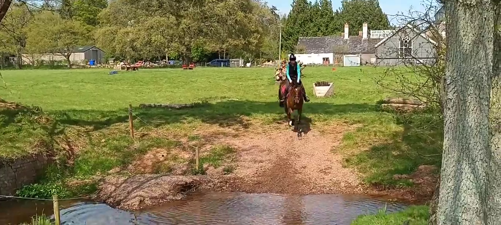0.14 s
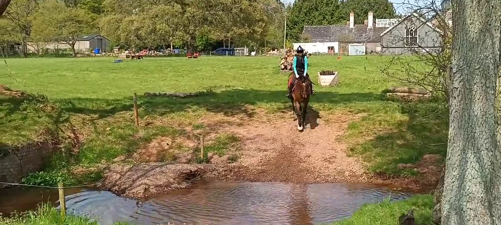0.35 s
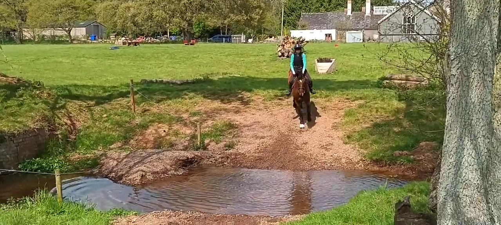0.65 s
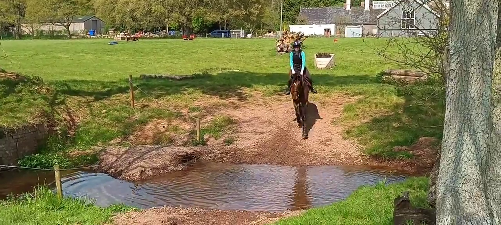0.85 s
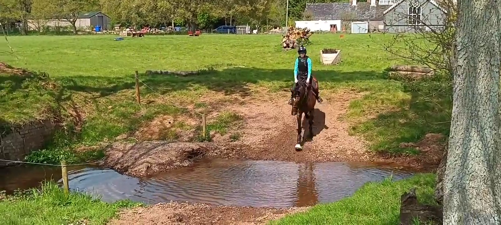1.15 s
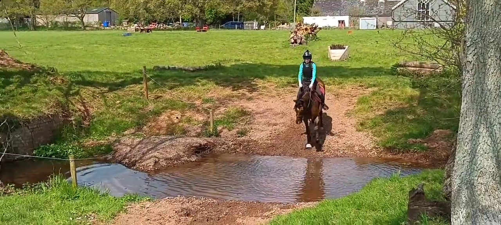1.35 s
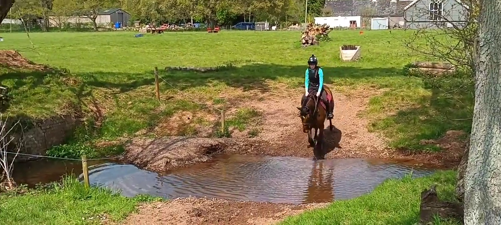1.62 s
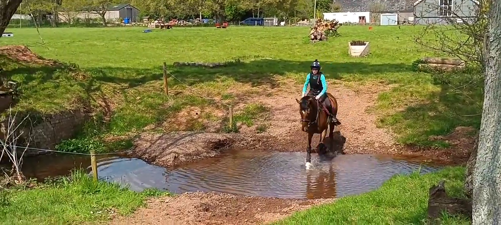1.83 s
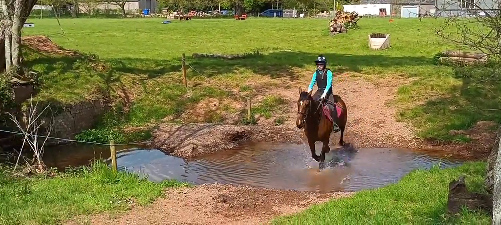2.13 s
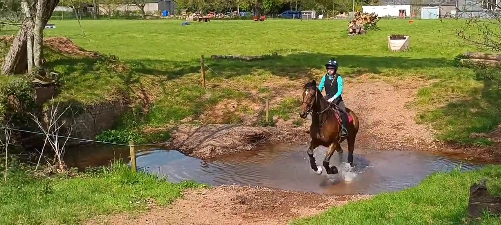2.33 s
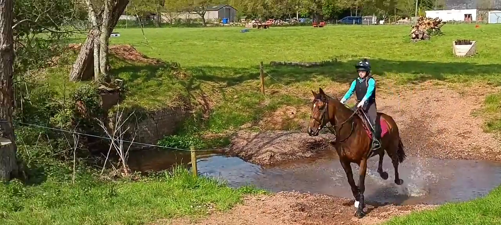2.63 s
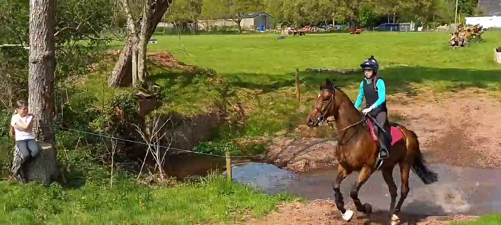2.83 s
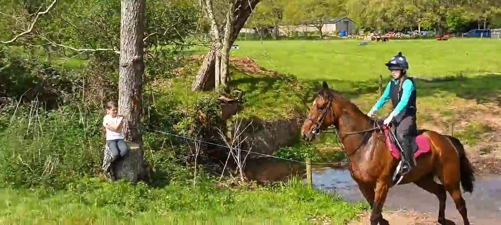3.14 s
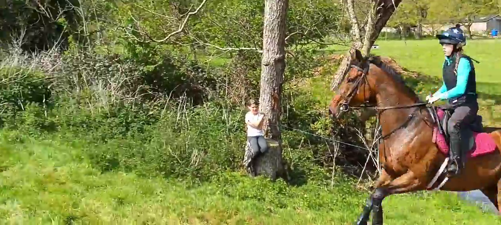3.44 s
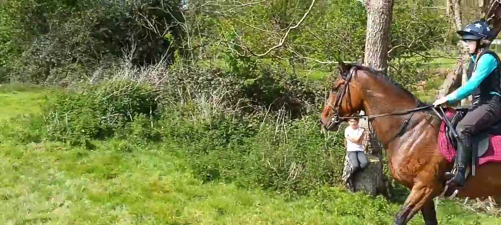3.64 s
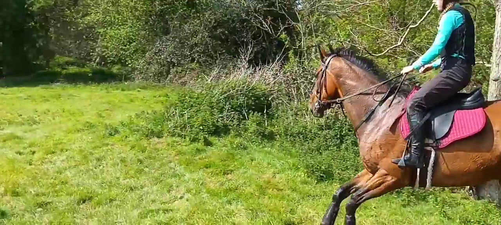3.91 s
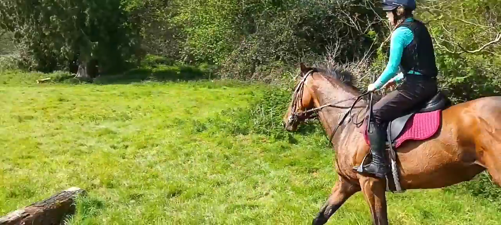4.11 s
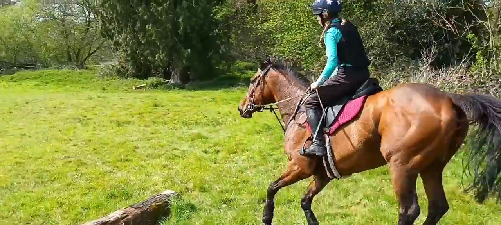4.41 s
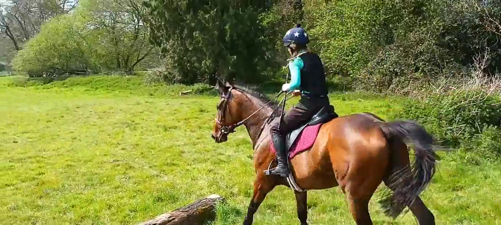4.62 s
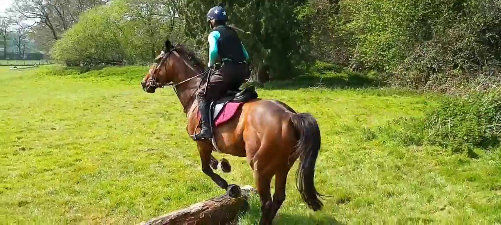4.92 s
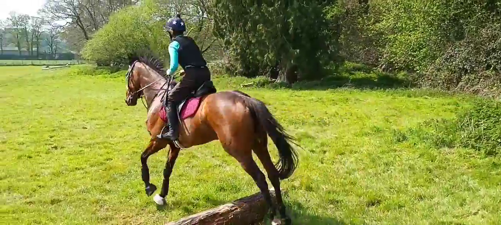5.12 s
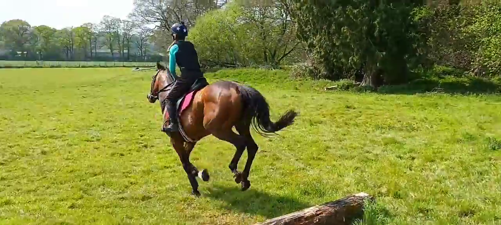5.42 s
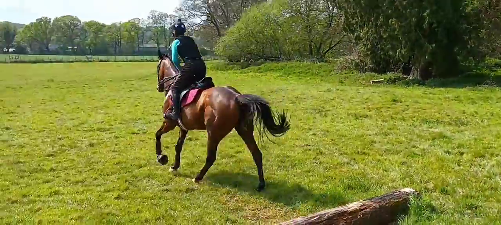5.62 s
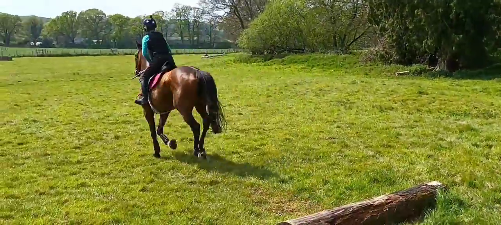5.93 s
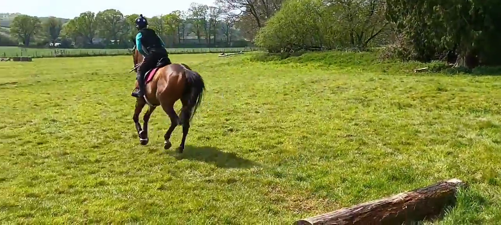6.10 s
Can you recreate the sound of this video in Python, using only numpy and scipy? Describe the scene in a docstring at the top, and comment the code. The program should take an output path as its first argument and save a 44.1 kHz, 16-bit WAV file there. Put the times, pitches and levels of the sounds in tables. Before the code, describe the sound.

Hooves crunch on gravel, splash through a shallow pool and thud by on turf, with a light breeze in an open field.

```python
"""A puff of breeze and the scuff of hooves on gravel: a horse comes down a bank, splashes through a
shallow pool and canters close past over turf into an open field. Hoof impacts excite damped thuds and
clacks; thrown stones and drops add up to granular noise, and trapped air rings as bubbles. Grass
rustles, leather creaks and the tack clinks once. Turbulence buffets the two ports of a small hand-held
microphone, over the faint murmur of open country."""
import sys
import numpy as np
from scipy import signal
from scipy.fft import rfft, irfft, next_fast_len
from scipy.io import wavfile
from scipy.ndimage import map_coordinates

SR = 44100
rng = np.random.default_rng(int(sys.argv[2]) if len(sys.argv) > 2 else 0)


def persist_wave(psi):
    """Save psi, clipped to +-1, as 16-bit WAV."""
    counts = np.round(np.clip(psi, -1, 1) * 32767).astype(np.int16)
    wavfile.write(sys.argv[1], SR, np.atleast_2d(counts).T)


N = 276066


def from_db(db):
    """Amplitude ratio of a level in decibels."""
    return 10 ** (np.asarray(db) / 20)


def rms_one(x):
    """Normalisation to unit mean power."""
    return x / np.sqrt(np.mean(x ** 2) + 1e-20)


def clock():
    """Time of every sample [s]."""
    return np.arange(N) / SR


def curve(rows, s):
    """Linear interpolation of (time, value) rows at time s."""
    return np.interp(s, *np.transpose(rows))


def colour(x, points):
    """Zero-phase filtering by a (frequency [Hz], gain [dB]) curve."""
    hz, db = np.transpose(points)
    size = next_fast_len(N + 4096)
    log_hz = np.log(np.arange(size // 2 + 1) * SR / size + 1)
    gain = from_db(np.interp(log_hz, np.log(hz), db))
    return irfft(rfft(x, size) * gain, size)[..., :N]


def band(x, low_hz, high_hz, order=2):
    """Causal Butterworth band-pass."""
    edges = [low_hz, min(high_hz, SR / 2 - 500)]
    return signal.sosfilt(signal.butter(order, edges, "band", fs=SR, output="sos"), x)


def noise(shape, low_hz, high_hz, order=2):
    """Band-limited Gaussian noise of unit rms."""
    return rms_one(band(rng.standard_normal(shape), low_hz, high_hz, order))


def pan(db):
    """Constant-power gains for a left-right level difference."""
    gains = from_db(np.array([db, -db]).reshape(2, -1) / 2)
    return gains / np.sqrt(np.mean(gains ** 2, axis=0))


def add(out, s, sound):
    """Superposition of a sound starting at time s."""
    at = max(round(s * SR), 0)
    out[:, at:at + sound.shape[-1]] += sound[..., :max(N - at, 0)]


def swell(t, rise):
    """Impact envelope: quadratic onset, height 1 at `rise`, rapid decay."""
    return (t / rise) ** 2 * np.exp(2 - 2 * t / rise)


def fade(t, rise, t60):
    """Linear attack, then exponential decay by 60 dB in t60."""
    return np.minimum(t / rise, 1) * from_db(-60 * np.maximum(t - rise, 0) / t60)


def grains(spectrum, per_s, spread_db, cycles, clump_db, count=14):
    """Shot noise: random impacts excite `count` resonators, each with a t60 of `cycles` periods."""
    out = np.zeros((2, N))
    low_hz, high_hz = spectrum[0][0], spectrum[-1][0]
    for hz in np.geomspace(low_hz, high_hz, count):
        hits = np.flatnonzero(rng.random(N) < per_s / count / SR)
        clumps = np.interp(hits, np.linspace(0, N, 300), rng.normal(0, 1, 300))
        sizes_db = spread_db * np.minimum(rng.exponential(1, len(hits)), 3.5) + clump_db * clumps
        sizes = from_db(sizes_db) * rng.choice([-1, 1], len(hits))
        skew = rng.integers(-2, 3, len(hits))  # scattered spots reach the ports at different times
        clicks = np.full((2, N), 1e-18)
        clicks[0, hits] = sizes
        clicks[1, np.clip(hits + skew, 0, N - 1)] = sizes * from_db(rng.normal(0, 0.74, len(hits)))
        radius, angle = from_db(-60 * hz / cycles / SR), 2 * np.pi * hz / SR
        feedback = [1, -2 * radius * np.cos(angle), radius ** 2]
        out += signal.lfilter(np.array([1, 0, -1]) * (1 - radius ** 2) / 2, feedback, clicks)
    return rms_one(colour(band(out, low_hz, high_hz), spectrum))


def hushed(at_s=5.905):
    """A 10 ms ramp from 0 to 1, where the rustle drops away and a thin hiss enters."""
    return np.clip((clock() - at_s) / .01, 0, 1)


# Spectrum of the open field: (frequency [Hz], gain [dB])
FIELD_SPECTRUM = [(25, -26.5), (70, 14.5), (110, -7), (280, 0), (480, -4), (800, -0.5), (1200, -11.5),
                  (2200, -30.5), (3100, -22), (4500, -13), (7000, -39.5), (9000, -37)]
# Soft mid-range hiss: (time [s], level [dB])
MURMUR_LEVEL = [(0, -66.5), (0.7, -67.5), (1.4, -70), (3, -74.5)]
def field(level_db=-65, hiss_db=-74.5, hiss_hz=2975, width_hz=1100):
    """Ambient noise of open country, partly coherent between the ports, with a thin hiss at the end."""
    air = rng.standard_normal((2, N)) + 0.87 * rng.standard_normal(N)
    murmur = from_db(curve(MURMUR_LEVEL, clock())) * noise((2, N), 450, 2100, order=3)
    hiss = hushed() * rms_one(band(air, hiss_hz - width_hz / 2, hiss_hz + width_hz / 2))
    return from_db(level_db) * rms_one(colour(air, FIELD_SPECTRUM)) + murmur + from_db(hiss_db) * hiss


# Faint held tones: (time [s], duration [s], frequency [Hz], level [dB])
FAR_TONES = [(3.654, 1.45, 379.3, -74), (4.52, 0.53, 517, -74.5)]
def far_tones(waver_hz=2.9):
    """Far-off sinusoids swell and fade, wavering by slow random frequency modulation."""
    out = np.zeros((2, N))
    for s, length, hz, db in FAR_TONES:
        size = int(length * SR)
        waver = np.interp(np.arange(size), np.linspace(0, size, 12), rng.normal(0, waver_hz, 12))
        phase = 2 * np.pi * np.cumsum(hz + waver) / SR
        add(out, s, from_db(db) * np.sqrt(2 * np.hanning(size)) * np.sin(phase))
    return out


# Strength of the breeze: (time [s], relative level [dB])
BREEZE_LEVEL = [(0.0, -76), (0.59, -72), (1.41, -48.5), (2.2, -66.5), (3.1, -60), (3.6, -75), (3.9, -73),
                (4.36, -63.5), (4.6, -70.5), (5.0, -65.5), (5.4, -67.5), (5.65, -59), (6.26, -77.5)]
# Air bumping a port: (time [s], relative level [dB], left-right [dB])
PUFFS = [(0.083, -32.5, 31), (0.531, -33, 11), (0.557, -22.5, 32), (0.813, -34, 32), (1.2198, -26.5, -29),
         (1.255, -37.5, -25), (1.381, -29.5, 37), (1.587, -30.5, -36), (2.495, -36.5, -18),
         (2.753, -41.5, -8), (2.886, -46, -34), (3.497, -39, 28), (4.144, -44, 4), (4.9642, -39, -29),
         (6.187, -38, -32.5)]
def breeze(rumble_db=3, puff_db=-2.5, puff_hz=106.4, eddy_db=-13):
    """Turbulent pressure rumbles at the ports; single puffs bump one and trail off in eddies."""
    air = rng.standard_normal((2, N)) + 0.37 * rng.standard_normal(N)
    out = from_db(curve(BREEZE_LEVEL, clock()) + rumble_db) * rms_one(band(air, 53, 167, order=3))
    t, rise = np.arange(SR // 4) / SR, 0.52 / puff_hz
    bump = swell(t, rise) * np.cos(2 * np.pi * puff_hz * (t - rise))
    for s, db, side in PUFFS:
        eddies = noise(len(t), 69.5, 1.21 * puff_hz) * fade(t, 0.018, t60=0.28)
        add(out, s - rise, from_db(db + puff_db) * pan(side) * bump)
        add(out, s - .03, from_db(db + eddy_db) * pan(side) * eddies)
    return out


def nearness_db(pass_s=3.13, closest_m=7.8, speed_m_per_s=7.3):
    """Spherical spreading from a horse on a straight path, relative to its closest point."""
    return -20 * np.log10(np.hypot(1, speed_m_per_s * (clock() - pass_s) / closest_m))


# Direction of the horse: (time [s], left-right [dB])
BEARING = [(0.2, 6), (0.55, 6.5), (0.85, 1.5), (2.1, 0), (2.6, -2.5), (3.35, -2.5), (4.4, 0.5), (4.8, 5),
           (5.3, 6.5), (5.75, 4), (6.05, 17)]
def bearing_db(s):
    """The level difference between the ports locates the horse at time s."""
    return curve(BEARING, s)


# Arrival-time difference: (time [s], lead of the left port [s])
LEFT_LEAD = [(0, .00014), (3.9, .00012), (4.6, 0), (5.9, -.00002), (6.05, -.00022)]
def arrival_delay(x):
    """A changing path difference shifts the horse's sound in time at the right port."""
    positions = np.arange(N) - curve(LEFT_LEAD, clock()) * SR
    return np.array([x[0], map_coordinates(x[1], [positions], order=3)])


# Spectrum of rustling grass and tack: (frequency [Hz], gain [dB])
RUSTLE_SPECTRUM = [(1100, -5.5), (1500, -10.5), (1900, -9), (2400, 3), (2900, -13.5), (3700, -13.5),
                   (4900, 3.5), (5900, -3.5), (7100, -1), (8400, -18), (13500, -21.5), (15200, -16.5),
                   (16500, -26)]
def rustle(level_db=-54.5, stride_s=0.499, swing_db=1.5, bank_db=-6, hush_db=-16.5):
    """Dense tiny contacts of grass and tack, amplitude-modulated by stride and distance."""
    t = clock()
    stride_db = swing_db * np.cos(2 * np.pi * (t - 4.29) / stride_s)
    ground_db = bank_db * np.clip(1 - (t - 0.8) / 0.49, 0, 1)  # quieter on the bank
    stalks = grains(RUSTLE_SPECTRUM, per_s=18000, spread_db=2, cycles=40, clump_db=1.5, count=44)
    gain = from_db(level_db + nearness_db() + stride_db + ground_db + hush_db * hushed())
    return gain * pan(0.85 * bearing_db(t) * (1 - hushed())) * stalks


# Saddle and bridle leather: (time [s], duration [s], frequency [Hz], bandwidth [Hz], level [dB])
CREAKS = [(2.774, 0.078, 700, 195, -49), (4.32, 0.076, 810, 230, -59), (4.314, 0.12, 1230, 200, -57.5),
          (4.438, 0.015, 3380, 410, -50), (5.1, 0.024, 4050, 270, -53.5)]
def creaks(slips_per_s=700, wobble=0.17):
    """Stick-slip friction: quick, uneven slips of leather excite one resonance."""
    out = np.zeros((2, N))
    for s, length, hz, width, db in CREAKS:
        size = int(length * SR)
        gaps = np.exp(rng.normal(0, wobble, size)) / slips_per_s
        slips = np.zeros(size)
        slips[np.minimum(np.cumsum(gaps) * SR, size - 1).astype(int)] = rng.standard_normal(size)
        ring = rms_one(band(slips, hz - width / 2, hz + width / 2))
        add(out, s, from_db(db) * ring * np.sqrt(np.hanning(size)))
    return out


# Modes of a metal piece of tack: (frequency [Hz], level [dB], t60 [s])
TACK_MODES = [(5324, -19, 0.019), (5860, -28, 0.0092), (5383, -45, 0.18), (6000, -49, 0.23),
              (6800, -48.5, 0.2), (8800, -51, 0.025)]
def tack(strike_s=.7438, touch_db=-48, chatter_db=-41):
    """Modal ringing: metal touches metal, then chinks sharply and chatters in a narrow band."""
    out, t = np.zeros((2, N)), np.arange(SR // 3) / SR
    rough = noise((2, len(t)), 5250, 5550)
    modes = sum(from_db(db) * fade(t, 0.0017, t60) * np.sin(2 * np.pi * hz * t)
                for hz, db, t60 in TACK_MODES)
    add(out, strike_s - 0.022, from_db(touch_db) * rough[:, ::-1] * fade(t, 0.0028, t60=0.07))
    add(out, strike_s, modes + from_db(chatter_db) * rough * fade(t, 0.0028, t60=0.18))
    return out


POOL_ENTRY_S, POOL_RISE_S, POOL_HOLD_S = 1.248, 0.32, 0.93
POOL_PATTER_DB, POOL_FIZZ_DB = -55, -42.5
def churn(t60=1.66):
    """Agitation of the pool builds to 1, holds while the horse wades, then decays exponentially."""
    t = clock() - POOL_ENTRY_S
    since_exit = np.maximum(t - POOL_RISE_S - POOL_HOLD_S, 0)
    return np.clip(t / POOL_RISE_S, 0, 1) * from_db(-60 * since_exit / t60)


def bubbles(level_db=-4, spread_db=9, glide=0.2, wade_s=1.5, wade_length_s=0.98, count=70):
    """Bubble resonance: air trapped by the wading legs rings and rises in pitch."""
    out, t = np.zeros((2, N)), np.arange(SR // 12) / SR
    for when, pitch, strength, side in rng.random((count, 4)):
        s, hz = wade_s + wade_length_s * when, 330 * 8 ** pitch
        t60 = 22 / hz
        phase = 2 * np.pi * hz * t * (1 + glide * np.minimum(t / t60, 1))
        ring = np.sin(phase) * fade(t, 0.00036, t60)
        gain = from_db(POOL_PATTER_DB + level_db + spread_db * strength)
        add(out, s, gain * pan(8 * (side - .5)) * ring)
    return out


# Air pockets opened by plunging legs: (time [s], level [dB], frequency [Hz], t60 [s])
PLOPS = [(1.482, -37, 327, 0.11), (1.636, -35, 805, 0.068), (1.649, -28.5, 304, .08),
         (1.666, -21.5, 347, 0.059), (1.666, -26.5, 810, 0.049), (1.679, -43, 675, .035),
         (1.714, -38, 700, 0.038), (1.727, -37, 577, 0.064), (1.865, -41.5, 241, 0.088),
         (1.883, -37, 303, 0.075), (1.909, -35, 331, 0.11), (1.92, -35.5, 534, 0.086),
         (1.953, -28.5, 575, 0.037), (1.957, -36.5, 304, .06), (1.985, -33.5, 294, 0.052),
         (1.994, -34, 650, 0.052), (2.305, -47, 780, .06)]
def plops(glide=0.18, rise_cycles=1.1):
    """Cavity resonance: each air pocket rings hollow and rises in pitch as it closes."""
    out, t = np.zeros((2, N)), np.arange(SR // 6) / SR
    for s, db, hz, t60 in PLOPS:
        phase = 2 * np.pi * np.cumsum(hz * (1 + glide * np.minimum(t / t60, 1))) / SR
        add(out, s, from_db(db) * np.sin(phase) * fade(t, rise_cycles / hz, t60))
    return out


def settling_s(s, gravel_t60=0.19, water_t60=0.25, turf_t60=0.085):
    """Decay time of thrown grains, set by the ground underfoot at time s."""
    if s < POOL_ENTRY_S:
        return gravel_t60
    return water_t60 if s < POOL_ENTRY_S + POOL_RISE_S + POOL_HOLD_S else turf_t60


# Grains thrown by a step: (time [s], rise [s], relative level [dB], depth [0 skim, 1 plunge])
SPRAYS = [(0.175, 0.014, -43, 0.13), (0.331, 0.057, -55, 0.071), (0.539, 0.021, -41, 0.054),
          (0.848, 0.038, -36.5, 0.29), (1.033, 0.0043, -53, 0.45), (1.072, 0.0085, -31, 0.45),
          (1.168, 0.012, -46, 0.36), (1.298, 0.012, -29.5, 0.17), (1.433, 0.0088, -28, 0.29),
          (1.473, 0.0061, -30.5, 0.42), (1.52, 0.023, -35, 0), (1.634, 0.0035, -36.5, 0.5),
          (1.656, 0.0057, -39.5, 0.91), (1.705, 0.0095, -49.5, 0.97), (1.766, 0.0053, -45, 0.65),
          (1.853, 0.013, -32.5, 0), (1.879, 0.033, -35, 0.61), (1.947, 0.012, -33, 0.6),
          (2.089, 0.0032, -32.5, 0.14), (2.19, 0.025, -32, 0.16), (2.29, 0.047, -39, 0.18),
          (2.464, 0.0065, -45, 0.67), (3.067, 0.0054, -58.5, 0.85), (2.621, 0.0089, -44, 0.71),
          (2.711, 0.0037, -46.5, 0.73), (3.117, 0.019, -52.5, 1), (3.238, 0.0091, -53.5, 0.83),
          (3.353, 0.0024, -52, 1), (3.5, 0.036, -44.5, 0), (3.578, 0.031, -38.5, 0.55),
          (3.637, 0.01, -39.5, 0.73), (3.999, 0.0071, -48.5, 0.22), (4.129, 0.018, -44.5, 0.24),
          (4.176, 0.013, -47, 0.69), (4.221, 0.0057, -48.5, 0.72), (4.33, 0.069, -55.5, 0.63),
          (4.547, 0.012, -51.5, 0.27), (4.777, 0.0081, -51, 0.32), (4.82, 0.024, -61, 0),
          (4.882, 0.0025, -60, 0.93), (5.843, 0.0013, -63, 1)]
# Clumps landing: (time [s], relative fine-grain level [dB], relative middling-grain level [dB])
SPATTERS = [(0.16, -68, -61.5), (0.272, -59, -78), (0.506, -57, -57), (0.584, -49, -46), (0.672, -56, -79),
            (0.757, -46.5, -70), (0.806, -49.5, -59), (0.883, -43, -37.5), (1.143, -44, -61),
            (1.322, -44, -36), (1.352, -48, -34.5), (1.453, -29, -29), (1.488, -33, -38),
            (1.526, -28.5, -46.5), (1.598, -31, -54), (1.66, -40.5, -32.5), (1.77, -43, -48),
            (1.836, -33, -51), (1.866, -31.5, -47), (1.891, -42.5, -32.5), (1.918, -28.5, -45),
            (1.978, -36.5, -36), (2.022, -61, -40.5), (2.144, -39.5, -48), (2.236, -39, -45.5),
            (2.258, -37.5, -45), (2.356, -39, -52), (2.378, -37, -52), (2.413, -38, -56),
            (2.469, -31.5, -62), (2.52, -46, -68), (2.85, -46, -61), (2.98, -46.5, -56.5),
            (3.602, -45, -42), (3.651, -38, -43.5), (3.67, -41, -52), (3.683, -50, -65)]
def spray_envelopes(slap_db=-13, trickle_db=-28, gurgle_db=-21):
    """Incoherent sources add in power: steps, clumps and churning water give four band envelopes."""
    power, t = np.zeros((4, 2, N)), np.arange(SR // 2) / SR
    big, middling, fine, top = power
    wading = churn()
    for s, rise, db, depth in SPRAYS:
        slap = from_db(slap_db) * fade(t, 0.0009, t60=0.085)
        burst = slap + fade(t, rise, settling_s(s) + 1.2 * rise)  # a slower step trails longer
        trickle = from_db(trickle_db) * fade(t, rise, t60=1)
        gurgle = from_db(gurgle_db) * wading[int(s * SR)] * fade(t, rise, t60=0.213)
        gains = from_db(db) * pan(bearing_db(s))
        # a deeper step moves bigger grains and has less crisp top
        add(big, s, (gains * from_db(-34 + 44.5 * depth) * (burst + gurgle)) ** 2)
        add(middling, s, (gains * from_db(-13.5 + 16 * depth) * (burst + trickle)) ** 2)
        add(fine, s, (gains * burst) ** 2)
        add(top, s, (gains * from_db(-9.5 * depth) * burst) ** 2)
    clump = fade(t, .003, t60=.06)
    for s, fine_db, middling_db in SPATTERS:
        add(middling, s, (from_db(middling_db) * pan(bearing_db(s)) * clump) ** 2)
        add(fine, s, (from_db(fine_db) * pan(bearing_db(s)) * clump) ** 2)
    pool = wading * pan(-4)
    big += (from_db(POOL_PATTER_DB - 18) * pool) ** 2
    middling += (from_db(POOL_PATTER_DB) * pool) ** 2
    fine += (from_db(POOL_FIZZ_DB) * pool) ** 2
    top += (from_db(POOL_FIZZ_DB - 13) * pool) ** 2
    return np.sqrt(power)


# Spectra of big, middling and fine grains: (frequency [Hz], gain [dB])
GULP_SPECTRUM = [(170, -13), (260, 3), (330, -1.5), (430, -4.5), (540, -0.5), (790, 0.5), (980, -11.5),
                 (1500, -15.5)]
PATTER_SPECTRUM = [(700, -30), (1050, -17), (1350, 2), (1700, 0), (2250, 6), (2520, 5), (2850, -15),
                   (3300, -2), (4200, -38)]
FIZZ_SPECTRUM = [(2800, -6.5), (3400, -11), (3900, -5), (4800, -3), (5800, -2.5), (7000, -6), (8400, -24),
                 (13500, -26.5), (15200, -21), (16500, -57.5)]
# Crisp top of thrown gravel, splashing water and grass: (time [s], gain [dB])
CRISP_GAIN = [(0, 1), (1.3, -32), (1.6, 2), (1.9, -8), (2.15, -17), (2.5, -34), (3.3, -31), (3.53, 3),
              (4.3, 5), (4.83, 5), (5.9, 22), (6.0, -11)]
def spray(gulp_db=-2, patter_db=4, fizz_db=2.5, snap_db=-18):
    """Granular noise of thrown stones, drops and soil: the smaller the grain, the higher it rings."""
    big, middling, fine, top = spray_envelopes()
    gulps = grains(GULP_SPECTRUM, per_s=1500, spread_db=2, cycles=24, clump_db=1.5)
    patter = grains(PATTER_SPECTRUM, per_s=2600, spread_db=3, cycles=50, clump_db=2, count=28)
    mist = grains(FIZZ_SPECTRUM, per_s=13000, spread_db=3, cycles=90, clump_db=2, count=56)
    snaps = grains(FIZZ_SPECTRUM, per_s=50, spread_db=2, cycles=24, clump_db=1)
    fizz = from_db(fizz_db) * (mist + from_db(snap_db) * snaps)
    treble = colour(fizz, [(6500, -25), (9000, 8), (13300, 7.5), (15000, 8.5)])
    crisp = from_db(curve(CRISP_GAIN, clock())) * treble
    return (big * from_db(gulp_db) * gulps + middling * from_db(patter_db) * patter
            + fine * fizz + top * crisp)


# Hooves striking the ground: (time [s], relative level [dB], frequency [Hz])
HOOFFALLS = [(0.548, -28, 160), (1.471, -26, 190), (1.495, -23, 253), (1.67, -29, 356), (2.136, -29, 243),
             (2.241, -35.5, 201), (2.5638, -22, 252), (2.6186, -27, 251), (2.7105, -29.5, 230),
             (2.9961, -34, 177), (3.128, -15, 266), (3.2327, -14.5, 387), (3.286, -29.5, 254),
             (3.363, -32.5, 334), (3.5903, -25.5, 255), (3.641, -18.5, 225), (3.652, -34, 251),
             (4.027, -40, 296), (4.1871, -19.5, 220), (4.231, -17, 287), (4.25, -40, 90),
             (4.295, -34, 95.5), (4.5583, -15, 207), (4.5735, -27.5, 201), (5.2697, -38, 262),
             (5.679, -44, 173), (5.846, -39.5, 216)]
def ground_rumble(level_db=-23, low_hz=48, high_hz=95):
    """The weight of each hoof excites low ground vibration, heard weaker with distance."""
    out, t, near_db = np.zeros((2, N)), np.arange(SR // 3) / SR, nearness_db()
    for s, db, _ in HOOFFALLS:
        force = rng.standard_normal((2, len(t))) + rng.standard_normal(len(t))
        shake = rms_one(band(force, low_hz, high_hz)) * fade(t, 0.0085, t60=0.28)
        add(out, s, from_db(db + level_db + near_db[int(s * SR)]) * shake)
    return out


def thuds(level_db=-8.5, rise_cycles=0.93, sod_db=-9, crumble_db=-14, clod_db=-16):
    """Inelastic impact: a hoof thuds over a deeper push of sod; soil crumbles and three clods fall."""
    out, t, gains = np.zeros((2, N)), np.arange(SR // 4) / SR, pan(-1)
    for s, db, hz in HOOFFALLS:
        rise = rise_cycles / hz
        phase = 2 * np.pi * hz * (t - rise)
        thud = swell(t, rise) * np.cos(1.09 * phase)
        sod = from_db(sod_db) * swell(t, 1.82 * rise) * np.cos(0.35 * phase)
        soil = from_db(crumble_db) * noise(len(t), 87, 1.26 * hz, order=3) * fade(t, 2 * rise, t60=0.15)
        add(out, s - rise, from_db(db + level_db) * gains * (soil - thud - sod))
        for lateness, pitch in rng.random((3, 2)):
            clod = swell(t, 0.6 * rise) * np.sin(phase * (1 + pitch))
            add(out, s + 0.018 * lateness, from_db(db + clod_db - 30 * lateness) * gains * clod)
    return out


def knock(t, hz, rise, spread=0.11):
    """Three close, heavily damped partials interfere, their phases new at each strike; peak 1."""
    partials = sum(size * np.cos(2 * np.pi * hz * ratio * (t - rise) + rng.normal(0, 0.62))
                   for ratio, size in [(1 - spread, .45), (1, .8), (1 + spread, .45)])
    sound = swell(t, rise) * partials
    return sound / np.abs(sound).max()


# Share of a contact scattered by the ground, least on the far turf: (time [s], gain [dB])
GROUND_SCATTER = [(3.4, -22.5), (4.5, -23), (5.3, -21), (6.05, -30.5)]
# Hard contacts of hoof, stone, water and tack, levels relative:
# (time [s], knock [dB], knock [Hz], overtone [dB], overtone [Hz], tick [dB], tick [Hz])
CLACKS = [(0.5447, -62, 1700, -50, 3200, -34, 6440), (0.947, -66, 1500, -60, 3000, -53, 6760),
          (1.084, -33, 694, -46, 1500, -43, 5600), (1.09, -24, 1370, -48, 2410, -47, 5200),
          (1.171, -42, 1510, -46, 4850, -22.5, 6060), (1.3035, -38, 1900, -46, 4400, -26, 6250),
          (1.383, -22.5, 2060, -44, 3420, -48, 5200), (1.4317, -50, 2200, -40, 4600, -20.5, 6000),
          (1.446, -24, 1510, -25, 1980, -37, 6200), (1.5549, -28, 2280, -15, 4260, -13.5, 5930),
          (1.623, -38, 2210, -34, 4400, -21, 5560), (1.6407, -15, 2250, -27, 3430, -24, 5370),
          (1.653, -30, 1420, -23, 2250, -23, 5200), (1.6685, -23, 594, -17.5, 2240, -34.5, 4900),
          (1.8617, -23.5, 2230, -33, 4700, -12.5, 5420), (1.949, -46, 1510, -43, 2500, -16.5, 5330),
          (1.955, -23, 1930, -18.5, 3360, -22, 5170), (2.0952, -27, 2390, -19, 4430, -18.5, 6570),
          (2.198, -34, 2400, -14, 4430, -16.5, 5730), (2.619, -16, 1080, -35, 2140, -18.5, 5450),
          (2.7117, -22.5, 960, -27.5, 1420, -28.5, 5000), (3.1247, -14.5, 700, -37.5, 1600, -28.5, 5800),
          (3.1385, -29, 644, -36, 1500, -33, 5600), (3.206, -62, 2270, -60, 4600, -47, 5500),
          (3.2383, -15.5, 1310, -23, 2300, -29.5, 5300), (3.322, -46, 2300, -52, 4400, -40, 5200),
          (3.3523, -17.5, 2350, -19, 4930, -34.5, 7340), (3.3632, -33.5, 890, -36, 1740, -52, 5160),
          (3.724, -57, 2200, -45, 4400, -61, 5000), (4.0241, -23.5, 1640, -27.5, 2970, -22.5, 5650),
          (4.0278, -20.5, 2130, -23.5, 4480, -38, 7500), (4.156, -33.5, 1770, -34.5, 2650, -35.5, 5200),
          (4.227, -23, 567, -35, 910, -52, 5600), (4.241, -49, 2300, -34, 4260, -49, 5470),
          (4.4064, -37, 2320, -60, 3300, -45, 5260), (4.505, -42, 2330, -65, 4030, -48.5, 5260),
          (4.558, -36.5, 675, -47.5, 1234, -56, 5250), (4.785, -46, 1190, -47, 2940, -30, 5570),
          (4.8941, -36.5, 2300, -44, 4300, -47, 6100), (4.968, -45.5, 1900, -49, 2860, -42.5, 5800),
          (5.112, -44, 2230, -59, 3230, -60, 5200), (5.1386, -31.5, 1470, -32.5, 2340, -40, 6700),
          (5.256, -55, 1560, -58, 2700, -36.5, 5960), (5.2706, -29.5, 1120, -29.5, 3000, -24, 5350),
          (5.271, -36, 2400, -25, 4400, -31.5, 7100), (5.422, -53, 1590, -51, 3950, -46, 5700),
          (5.4952, -50, 2160, -50, 4170, -46, 6040), (5.6736, -37, 1370, -36, 2510, -45, 5000),
          (5.846, -29.5, 2800, -42, 4430, -35, 6470), (6.0535, -21, 1416, -43, 4300, -68, 4010)]
def clacks(knock_rise=.0016, overtone_rise=0.0012, tick_rise=0.00088):
    """Brief contact excites high modes: a graze, then knock, overtone and tick, with ground scatter."""
    out, t = np.zeros((2, N)), np.arange(SR // 6) / SR
    bright = rms_one(colour(noise(N, 2900, 10000), FIZZ_SPECTRUM))
    for s, knock_db, hz, overtone_db, overtone_hz, tick_db, tick_hz in CLACKS:
        gains, tick_gains = pan(bearing_db(s) + 1), pan(bearing_db(s))
        rough = from_db(curve(GROUND_SCATTER, s)) * noise((2, len(t)), 0.707 * hz, 1.31 * hz, order=4)
        graze = rough[:, ::-1] * swell(t, 0.0069)
        scatter = rough * fade(t, 2 * knock_rise, t60=0.093)
        at = rng.integers(N - len(t))
        crack = bright[at:at + len(t)] * fade(t, 0.004, t60=0.045)
        body = knock(t, hz, knock_rise)
        overtone = knock(t, overtone_hz, overtone_rise, spread=0.07)
        tick = knock(t, tick_hz, tick_rise)
        glint = noise(len(t), 7500, 20000) * swell(t, tick_rise)
        add(out, s - .008, from_db(knock_db - 9) * gains * graze)
        add(out, s - knock_rise, from_db(knock_db - 1) * gains * (body + scatter))
        add(out, s - overtone_rise, from_db(overtone_db) * gains * overtone)
        add(out, s - tick_rise, from_db(tick_db + 3.5) * tick_gains * tick)
        add(out, s - 0.0028, from_db(tick_db - 13) * tick_gains * crack)
        add(out, s - tick_rise, from_db(tick_db - 18) * tick_gains * glint)
    return out


def scene():
    """Linear superposition of the horse, the breeze and the field."""
    horse = thuds() + ground_rumble() + clacks() + tack() + creaks()
    horse = horse + plops() + bubbles() + spray() + rustle()
    return arrival_delay(horse) + breeze() + field() + far_tones()


# Response of each microphone port: (frequency [Hz], gain [dB])
LEFT_RESPONSE = [(900, 0), (1200, -1.8), (1900, -4), (2400, -8), (2750, -2), (3200, 2.2), (3700, 1.2),
                 (4300, -2.4), (5000, -4.8), (5600, 0), (6200, 3), (6800, 3.5), (9000, 2), (15000, 1)]
RIGHT_RESPONSE = [(900, 0), (1200, 1.2), (1900, 2), (2400, 2.7), (2750, 1.3), (3200, -4.8), (3700, -1.8),
                  (4300, 1.5), (5000, 2.2), (5600, 0), (6200, -9), (6800, -21), (8500, -23), (11000, -20),
                  (13000, -14), (15000, -5)]
def record(dry, low_cut_hz=41, high_cut_hz=16300, dip_hz=435, dip_width_hz=70, dip_depth=0.48):
    """Frequency response: each port has its own tone; both share a narrow dip and band limits."""
    ports = np.array([colour(dry[0], LEFT_RESPONSE), colour(dry[1], RIGHT_RESPONSE)])
    ports -= dip_depth * band(ports, dip_hz - dip_width_hz / 2, dip_hz + dip_width_hz / 2, order=1)
    ports = signal.sosfilt(signal.butter(2, low_cut_hz, "high", fs=SR, output="sos"), ports)
    return signal.sosfilt(signal.ellip(10, .1, 80, high_cut_hz, fs=SR, output="sos"), ports)


dry = scene()
out = record(dry)
persist_wave(out)
```